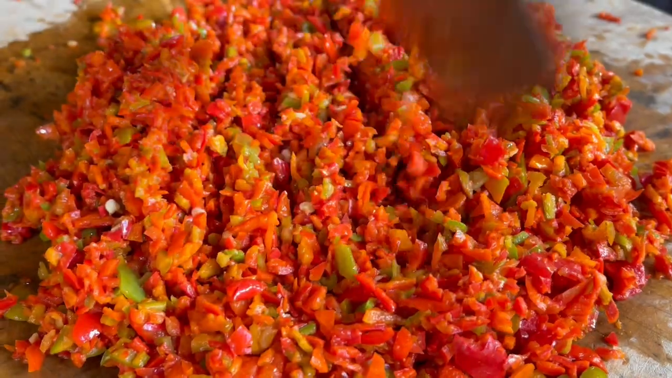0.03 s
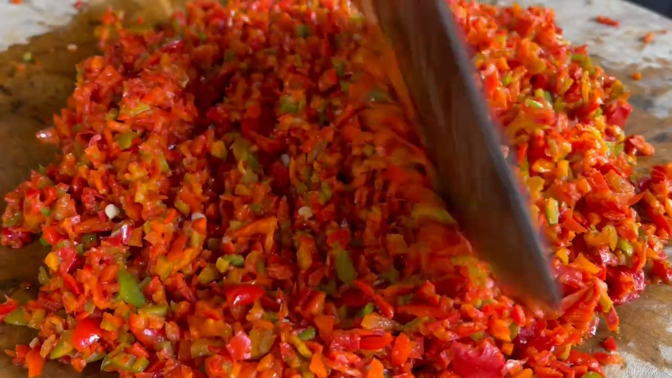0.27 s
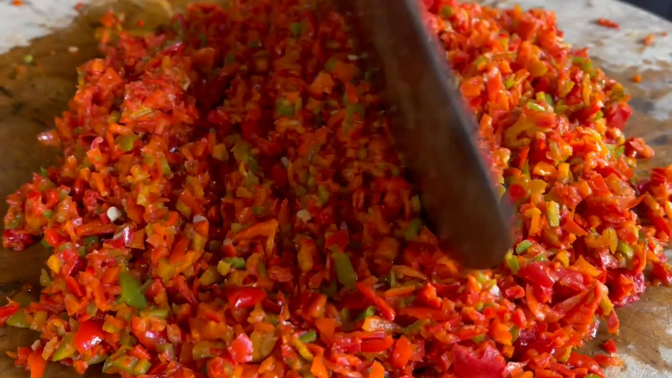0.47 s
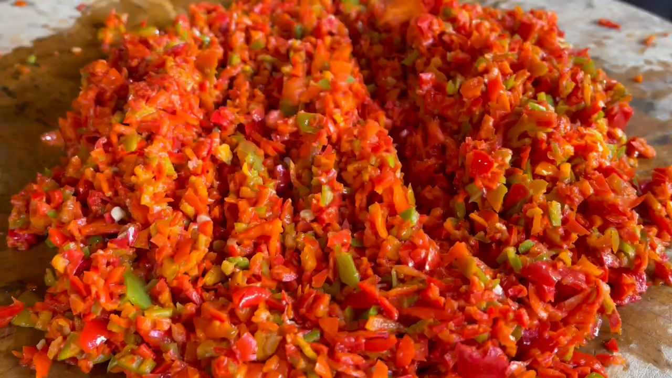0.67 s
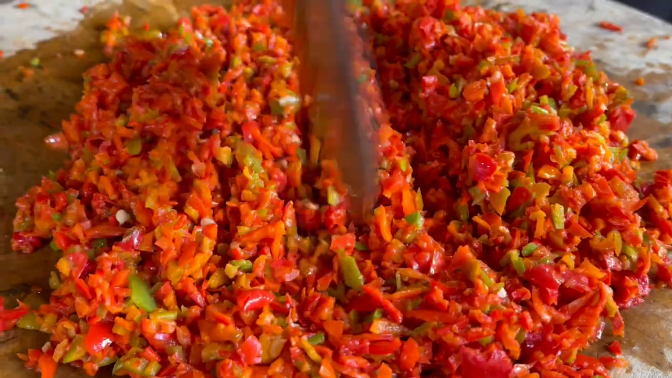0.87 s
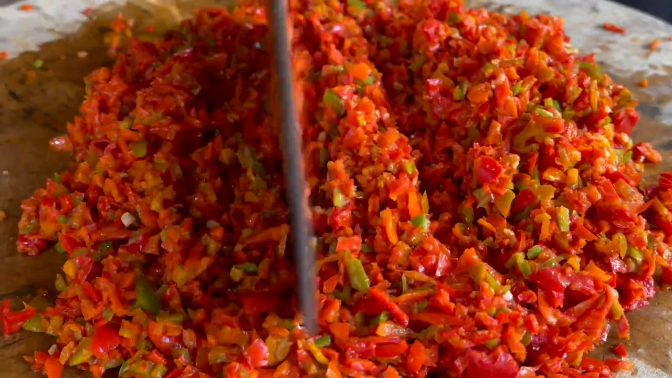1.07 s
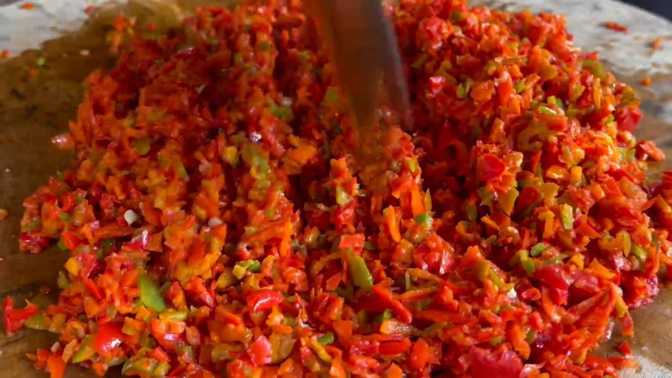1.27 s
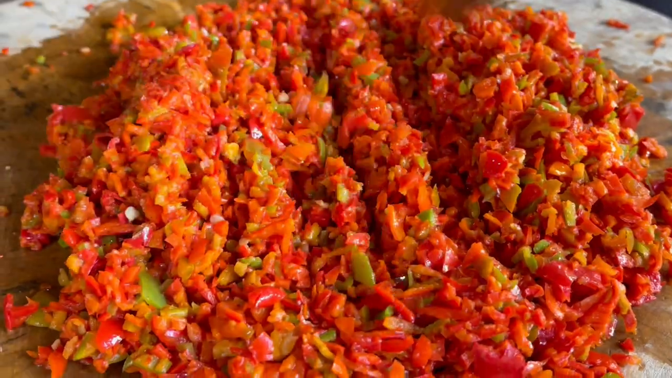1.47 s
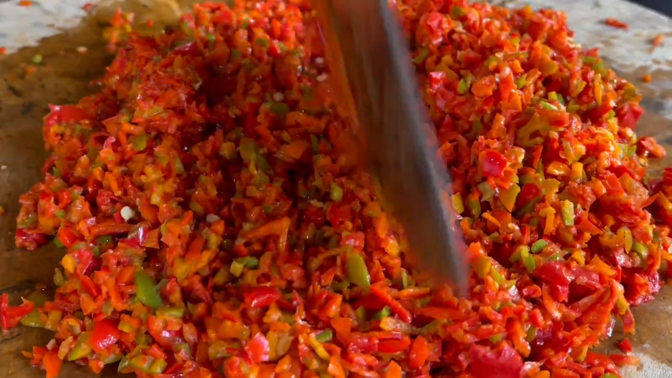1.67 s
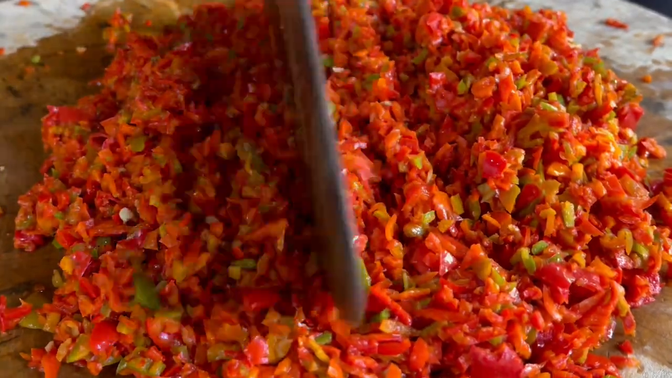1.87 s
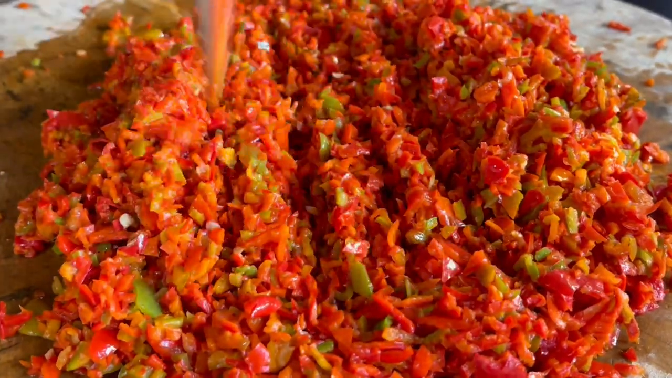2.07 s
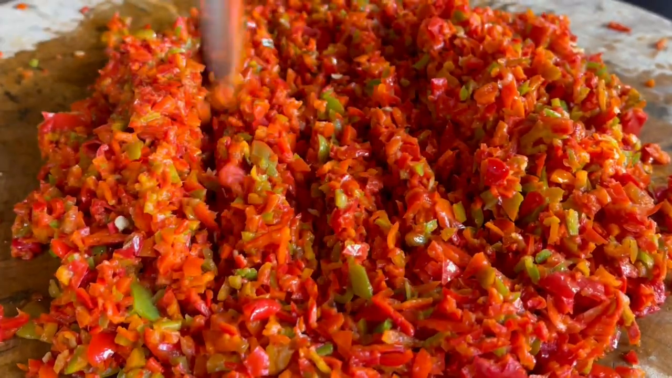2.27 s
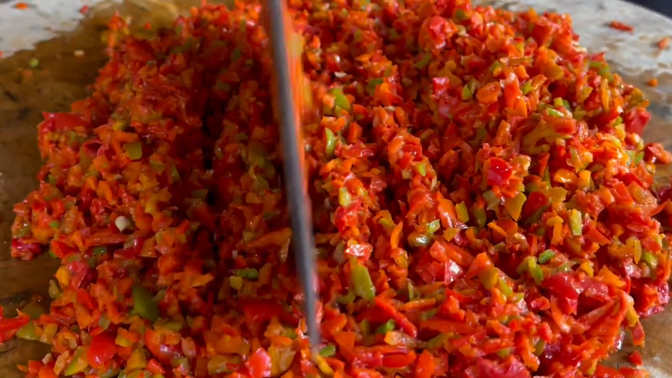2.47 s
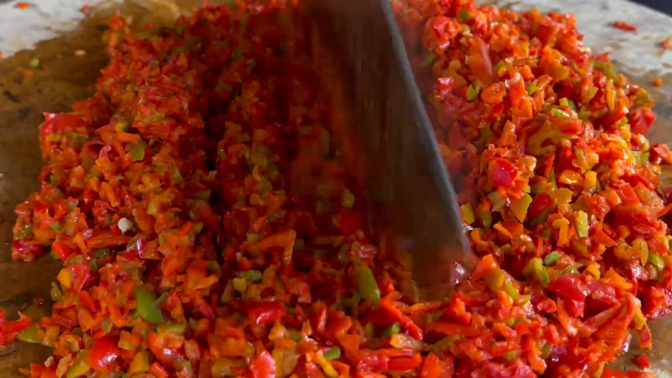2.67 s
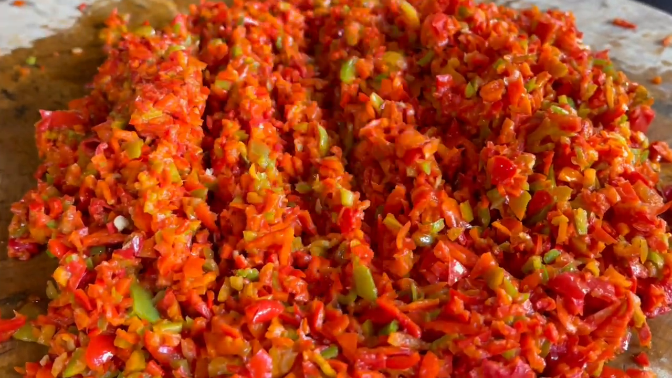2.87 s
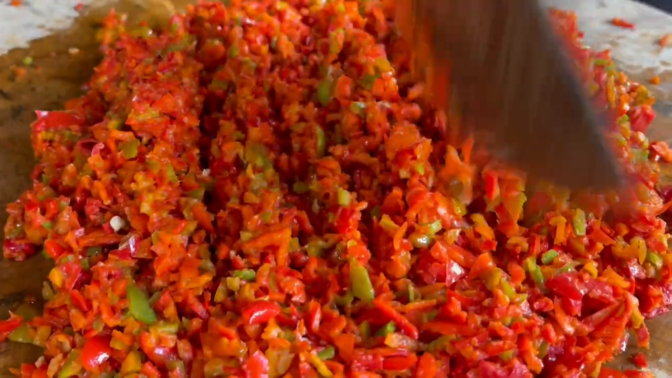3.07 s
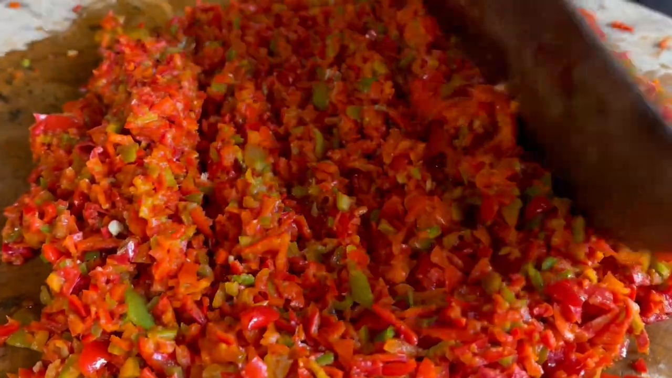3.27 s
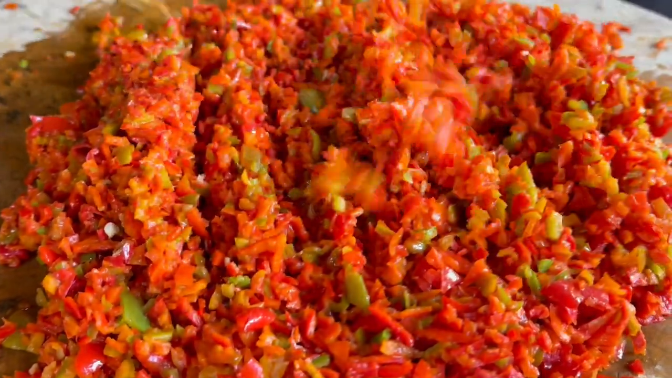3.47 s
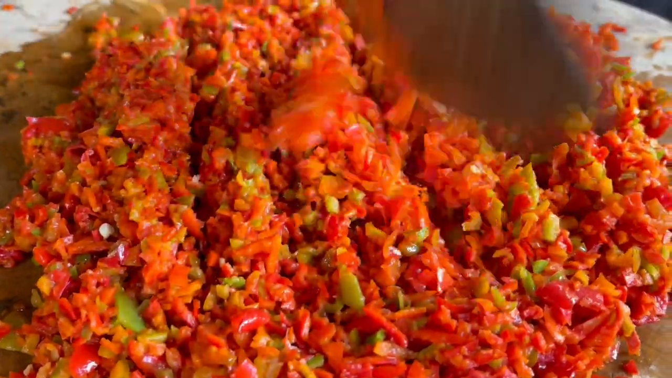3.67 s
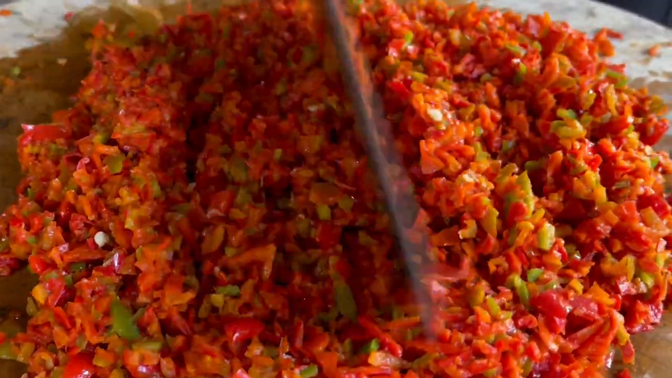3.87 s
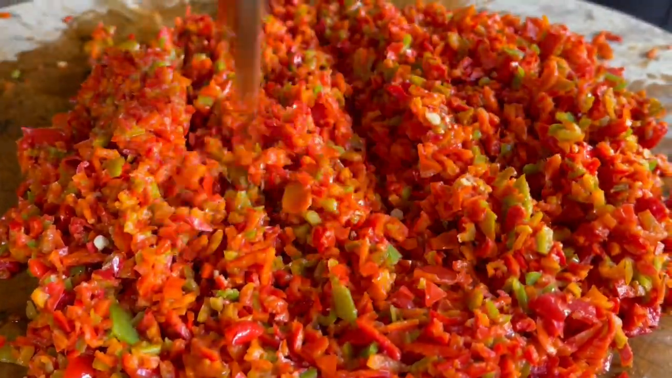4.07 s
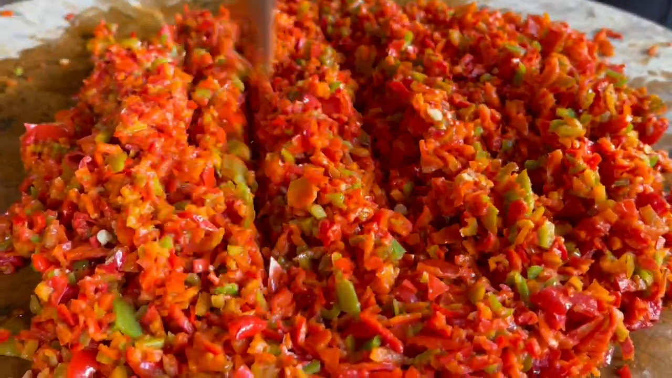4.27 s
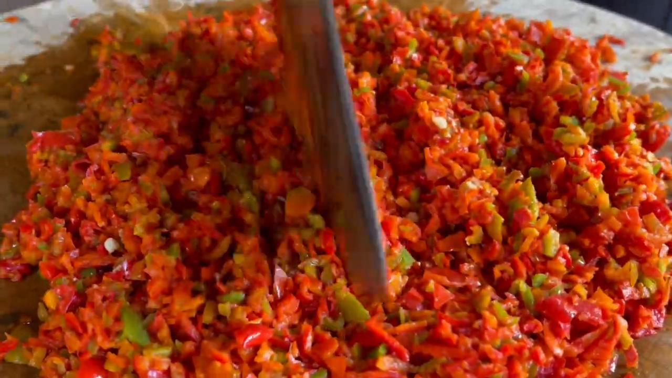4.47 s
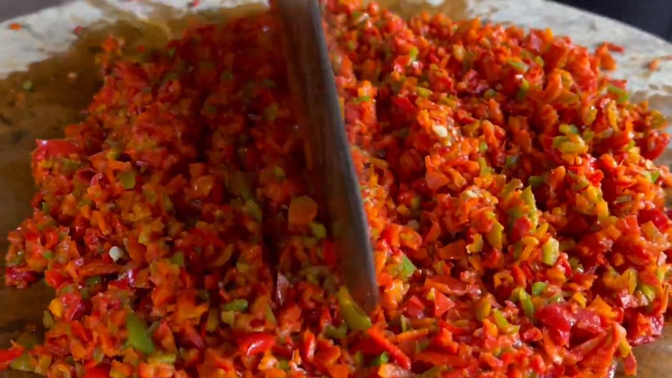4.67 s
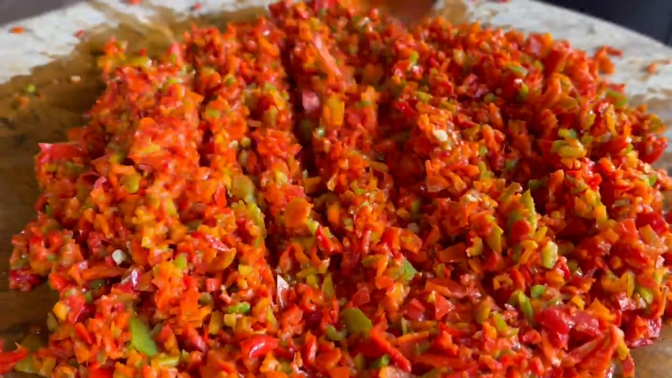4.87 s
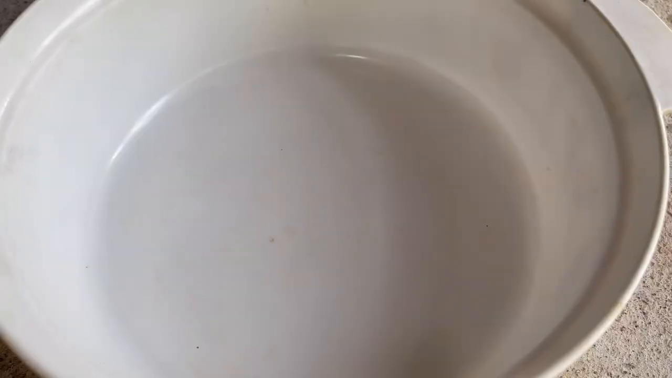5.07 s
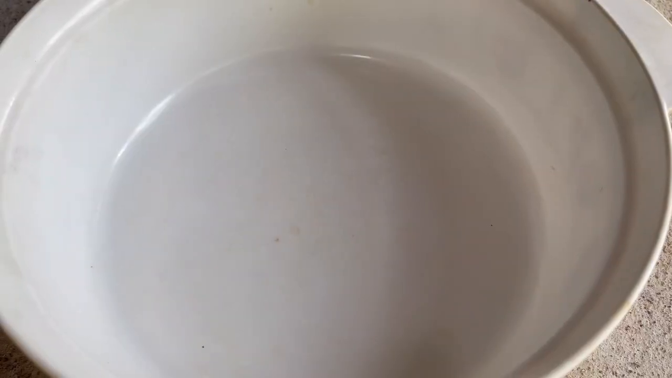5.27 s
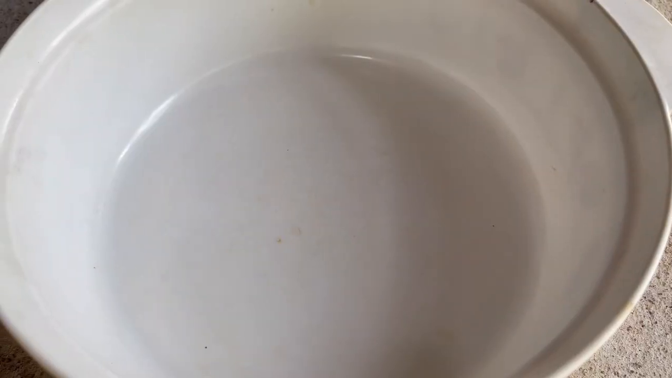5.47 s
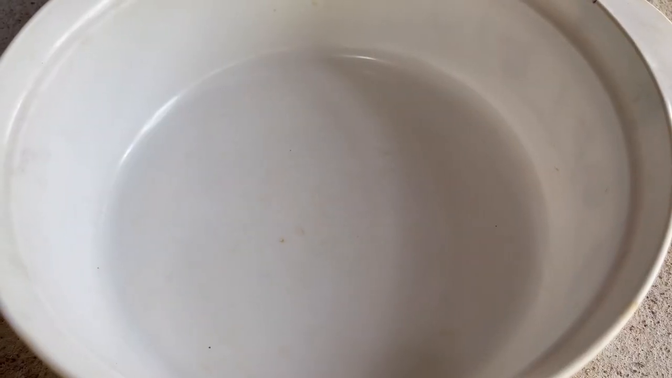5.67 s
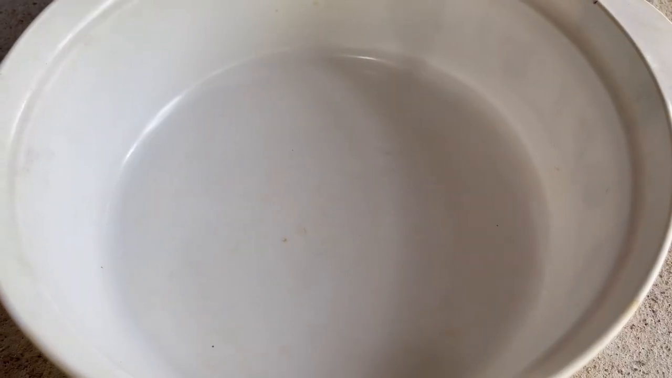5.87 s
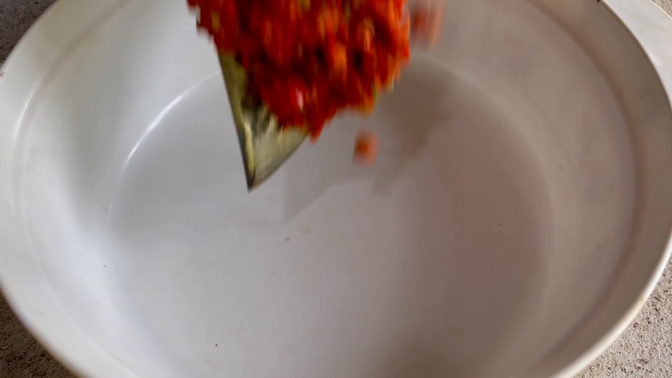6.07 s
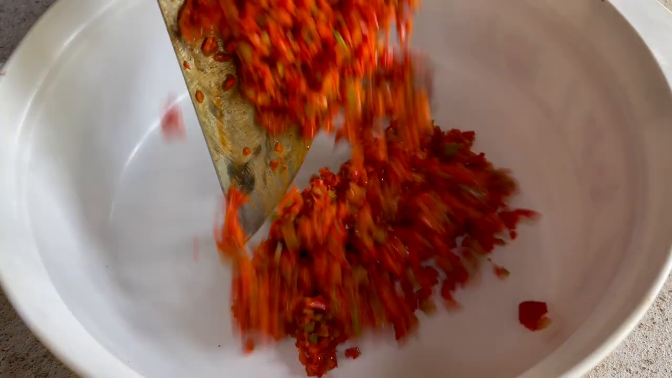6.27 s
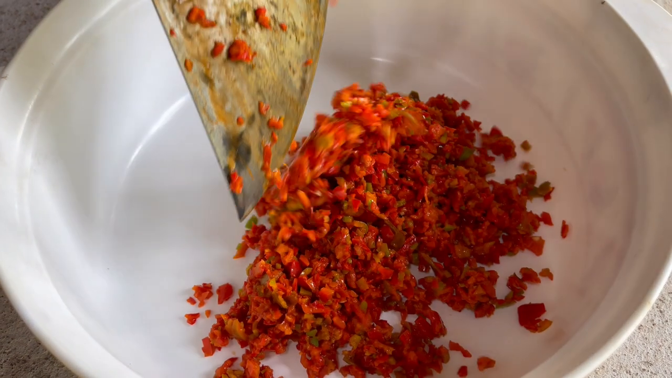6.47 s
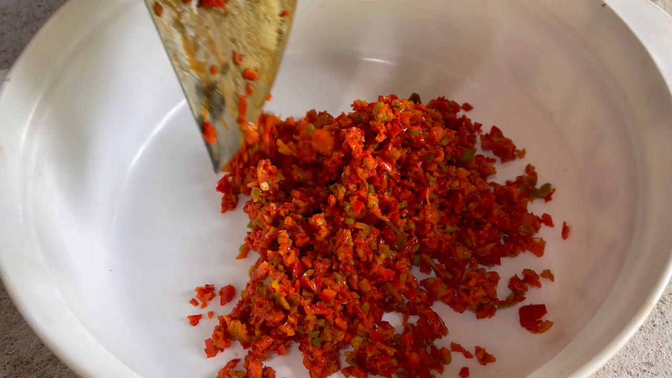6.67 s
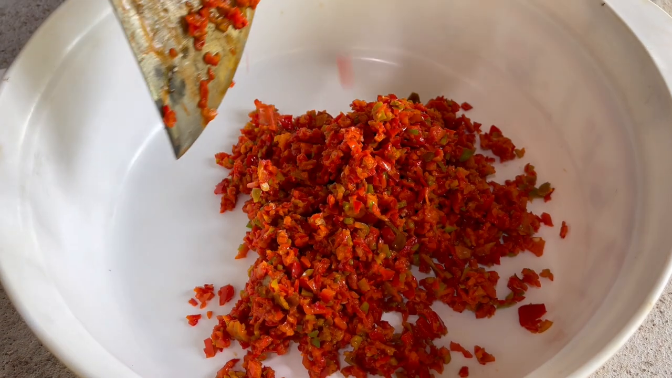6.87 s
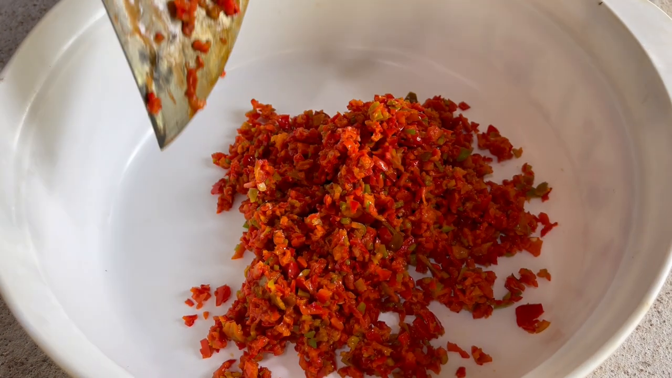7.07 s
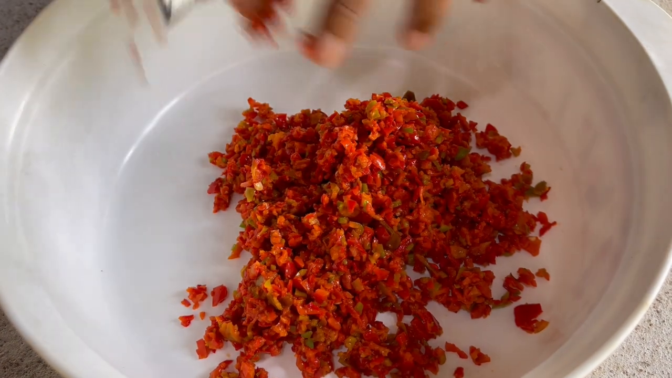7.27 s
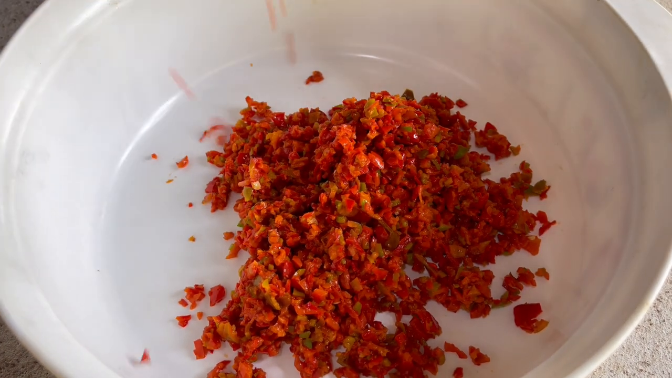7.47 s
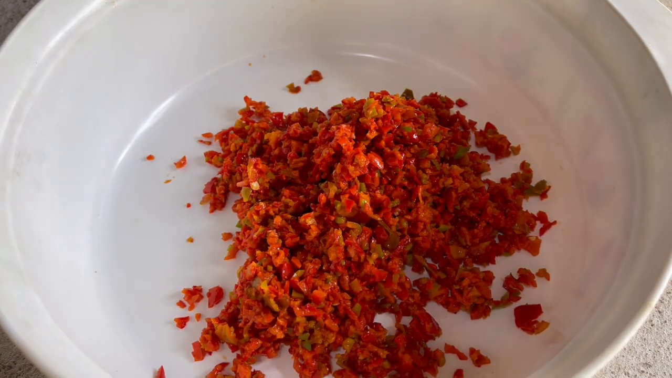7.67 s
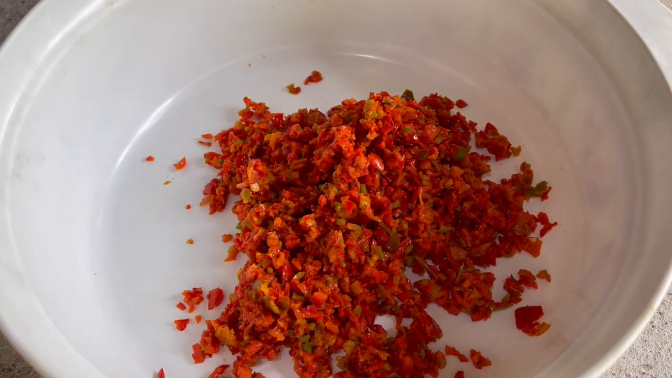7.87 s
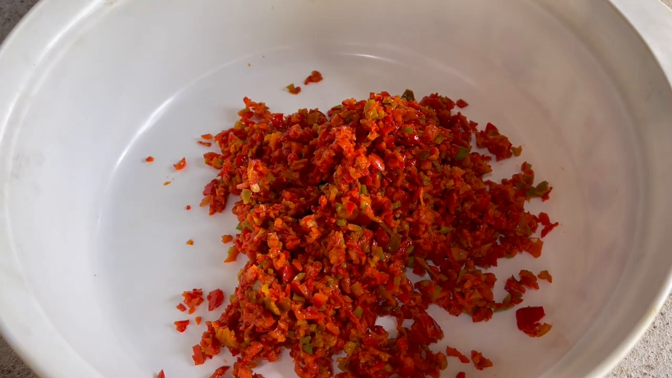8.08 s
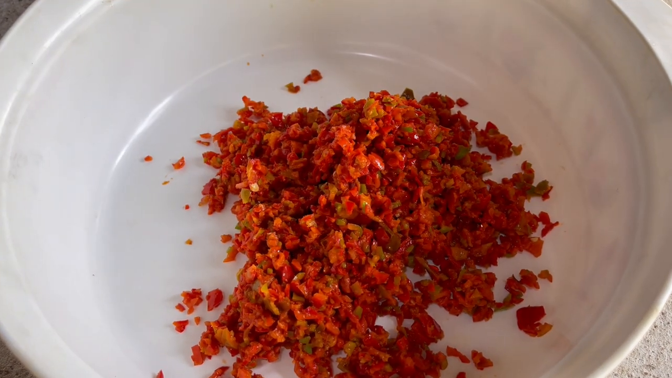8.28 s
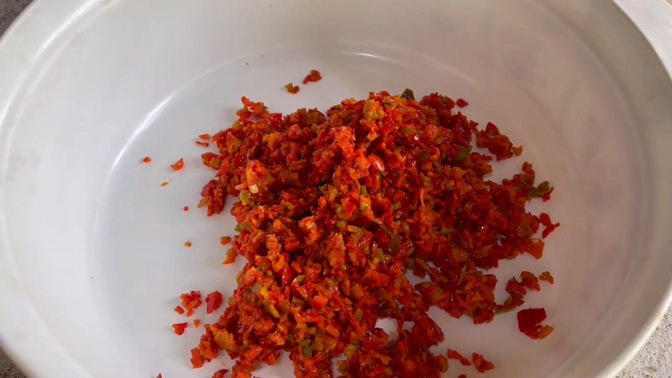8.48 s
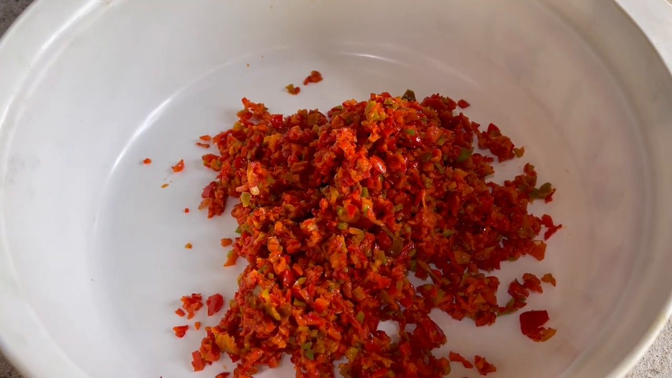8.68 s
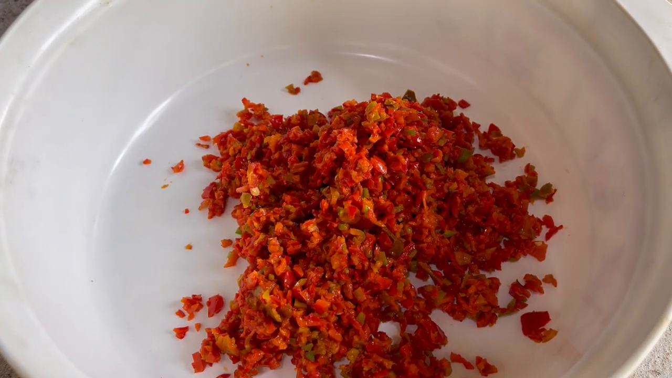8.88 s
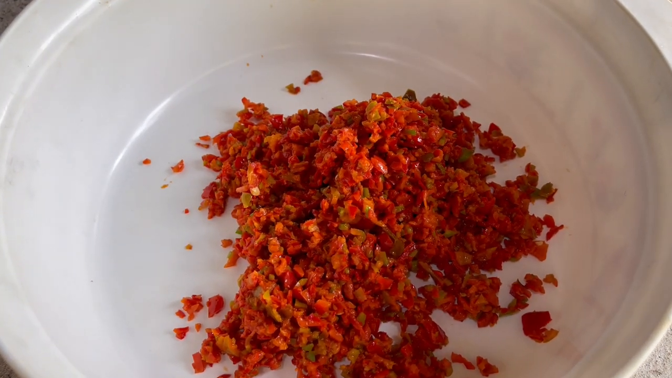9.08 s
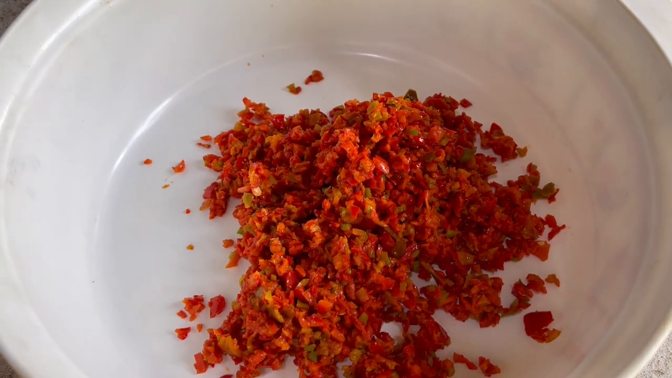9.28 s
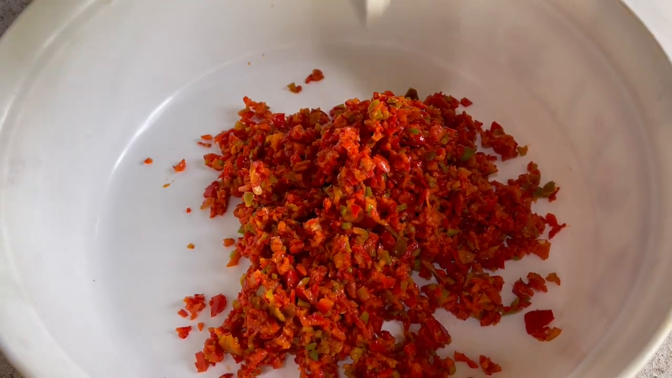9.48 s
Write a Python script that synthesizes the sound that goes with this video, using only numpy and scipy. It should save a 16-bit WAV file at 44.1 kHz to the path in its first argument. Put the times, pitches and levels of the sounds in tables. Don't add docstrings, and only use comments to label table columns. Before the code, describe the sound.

Loud, dry knife knocks with gritty crunch repeat evenly on a wooden block, captured closely in stereo in an open yard with falling chick whistles. The scene cuts abruptly to something much quieter: low rumble, a faint cock, then wet lumps splatting in a hard bowl, hissing wipes, crumbs ticking and stuttering scrapes of the blade on the block. Faint bird notes and insects remain at the end.

```python
import sys
import numpy as np
from scipy import signal
from scipy.fft import rfft, irfft, next_fast_len
from scipy.io import wavfile
from scipy.ndimage import uniform_filter1d, minimum_filter1d

SR = 44100
rng = np.random.default_rng(int(sys.argv[2]) if len(sys.argv) > 2 else 0)


def makeup_ratio(level_db):
    decades = np.asarray(level_db, float) / 20
    return 10 ** decades


def to_wav(sig):
    pcm = np.clip(np.atleast_2d(sig), -1, 1) * 32767
    pcm = np.round(pcm).astype(np.int16)
    wavfile.write(sys.argv[1], SR, pcm.T)


N = 420713
T = np.arange(N) / SR

CUT_S = 4.999, 5.043
# time in seconds, peak in dB, knock in dB rel. peak, crunch in dB rel. peak.
CHOPS = [(0.2378, -5, -9.5, -26.5), (0.513, -7.5, -7.5, -19), (0.793, -6.5, -6.5, -25),
         (1.066, -7.5, -5, -21.5), (1.3513, -7, -6.5, -22), (1.6339, -10.5, -1.5, -20),
         (1.9002, -7, -4.5, -23), (2.1714, -8.5, -2.5, -23), (2.4544, -6.5, -5, -23.5),
         (2.7313, -6.5, -7.5, -22), (3.01, -6.5, -7.5, -22), (3.3086, -7, -13.5, -16.5),
         (3.597, -6.5, -6.5, -20.5), (3.882, -8.5, -5, -18), (4.1629, -7, -3, -21.5),
         (4.441, -8, -6, -22.5), (4.7312, -8.5, -6, -27)]
CHOP_S, CHOP_DB, KNOCK_DB, CRUNCH_DB = np.transpose(CHOPS)
# hum while sinking, upper hum, top of the crunch, lower rattle and
# upper rattle, all in dB.
COLOUR = [(6, -18.5, 1.5, -49.5, -52.5), (8.5, -25.5, 0.5, -41.5, -53), (-8.5, -41, -1.5, -46, -53),
          (0, -38, 2, -48.5, -56), (-4.5, -35.5, -5, -44.5, -54), (3.5, -37.5, -2, -48.5, -58.5),
          (2, -32, 0.5, -50.5, -63), (-1, -36, -4.5, -60, -60.5), (1, -32.5, -2.5, -47.5, -57),
          (5.5, -35, 1, -46.5, -51.5), (1, -22, -2.5, -47, -46.5), (9, -21, -5.5, -51, -53.5),
          (-5, -39, -2.5, -45.5, -55.5), (-3.5, -16.5, -3.5, -52, -54.5), (-2, -39, 0, -46, -54),
          (0.5, -37, -3, -45.5, -52.5), (4, -32, 4, -47, -55.5)]
SINK_HUM_DB, UPPER_HUM_DB, CRUNCH_TOP_DB, LOW_RATTLE_DB, HIGH_RATTLE_DB = np.transpose(COLOUR)
# time in seconds, peak in dB, brightness in dB rel. peak.
TAPS = [(5.358, -57, -19.5), (5.682, -45, -12), (6.168, -36, -35), (6.181, -28.5, -16.5), (6.226, -34, 0.5),
        (6.243, -46, -11), (6.285, -29.5, 8), (6.319, -35, -3.5), (6.337, -52, -19), (6.341, -21, -5.5),
        (6.36, -41, -6), (6.403, -33.5, -4), (6.629, -27.5, -3), (6.666, -50, -2.5), (6.764, -30, -5),
        (7.419, -24.5, -14), (7.437, -21.5, -13), (7.525, -34, -23), (7.827, -47.5, -1),
        (7.912, -54.5, 1.5), (8.033, -46.5, 10), (8.196, -33.5, 6), (8.625, -53.5, -1), (8.726, -53.5, 4)]
# frequency in Hz, level in dB, t60 in seconds.
BOWL_MODES = [(220, -20.5, 0.02), (500, -2, 0.061), (780, -6, 0.028), (1047.5, -3, 0.02517),
              (1250, -2, 0.066), (1430, -1, 0.058), (1910, 0, 0.012), (2443, -10, 0.16), (2800, 0, 0.0073),
              (4247, -13, 0.03185), (5360, -16.5, 0.018)]
# frequency in Hz, left-right likeness from 0 to 1.
NEAR_ALIKE = [(60, .996), (150, .985), (300, .75), (700, .65), (2500, .88), (7000, .95), (10000, .99)]


def at_hz(points, hz):
    table = np.array(points)
    return np.interp(np.log(hz), np.log(table[:, 0]), table[:, 1])


def rms_one(x):
    return x / np.sqrt(np.mean(x ** 2) + 1e-20)


def clicks(times, sizes):
    out = np.zeros(np.shape(sizes)[:-1] + (N,)) + 1e-18
    out[..., np.round(np.asarray(times) * SR).astype(int)] = sizes
    return out


def dying(x, t60):
    return signal.lfilter([1], [1, -makeup_ratio(-60 / (t60 * SR))], x)


def swelling(x, t60):
    return dying(x[::-1], t60)[::-1]


def ring(x, hz, t60):
    r, w = makeup_ratio(-60 / (t60 * SR)), 2 * np.pi * hz / SR
    return signal.lfilter([0, np.sin(w)], [1, -2 * r * np.cos(w), r * r], x)


def humming(noise, hz, t60):
    return rms_one(ring(ring(noise, hz, t60), hz, t60))


def highpass(x, order, hz):
    return signal.sosfilt(signal.butter(order, hz, "high", fs=SR, output="sos"), x)


def drift(rate):
    knots = rng.standard_normal(int(N / SR * 100) + 2)
    return np.interp(T * rate, np.arange(len(knots)), knots)


def bands(gain_at, likeness, grain_db):
    edges_hz = 20 * 2 ** np.arange(0, 10, .5)
    grain = makeup_ratio(grain_db * rng.exponential(1, N).clip(0, 5))
    white = rms_one(rng.standard_normal((2, 2, N)) * grain)
    out = 0
    for k, (low, high) in enumerate(zip(edges_hz, edges_hz[1:])):
        band = signal.butter(2, [low, high], "band", fs=SR, output="sos")
        mid, side = signal.sosfilt(band, white[k % 2])
        hz = np.sqrt(low * high)
        alike = np.clip(at_hz(likeness, hz), -1, 1)
        stereo = np.sqrt(1 + alike) * mid + np.sqrt(1 - alike) * side * [[1], [-1]]
        out = out + gain_at(hz) * stereo
    return out


def struck(modes, times, hit_db, spread_db, side_db, contact_turns):
    # frequency in Hz, left over right in dB.
    block_left = [(160, 0), (420, 2), (680, 4), (1100, 2.5), (2900, 0)]
    out = 0
    chance = rng.standard_normal((len(times), len(modes), 2)).clip(-2, 2)
    for k, (hz, level_db, t60) in enumerate(modes):
        lean = side_db * (1 - at_hz(NEAR_ALIKE, hz)) * chance[:, k, 1] + at_hz(block_left, hz) / 2
        lean = lean * [[1], [-1]]
        sizes = (-1) ** k * makeup_ratio(hit_db(hz) + level_db + spread_db * chance[:, k, 0] + lean)
        soft = np.exp(-hz / contact_turns / SR)
        push = signal.lfilter([(1 - soft) ** 2], [1, -2 * soft, soft ** 2], clicks(times, sizes))
        out = out + ring(push, hz, t60) * (1 + (2 * np.pi * contact_turns) ** 2)
    return out


def block_knocks():
    # frequency in Hz, level in dB, t60 in seconds.
    block_modes = [(57, -20, 0.11), (104, -2, 0.026), (154.14, 0.5, 0.1), (260, -9, 0.037),
                   (336, -16.5, 0.052), (465, -9, 0.067), (590, 5.5, 0.036), (650, 7, 0.01),
                   (884, -4, 0.041), (952.7, -3.5, 0.059), (1176, 8, 0.008), (1425, 2.5, 0.011),
                   (1840, -16, 0.03), (1806, -10, 0.019), (2164, -6, 0.02)]
    # frequency in Hz, level in dB, t60 in seconds.
    dent_modes = [(724, 8, 0.033), (1900, -11, 0.015)]
    # frequency in Hz, level in dB, t60 in seconds.
    clack_modes = [(1810, -25.5, 0.013), (2097, -25.5, 0.052), (2420, -21, 0.043)]
    # thump, hollow, lower over upper main mode, lower over upper knock mode
    # and late clack, all in dB.
    seating = [(-2, -3, -1, -4, 0.5), (1, -4, -0.5, -7, -7.5), (0, 2, 4.5, 2.5, -5), (2, 3, 1.5, 3.5, -4),
               (0, -3, 1.5, -2, 0), (0.5, -7, 2, -4.5, -2.5), (2, 3.5, 2, 2, -7.5), (5, 4.5, 4, 3.5, -17.5),
               (2, 5.5, 2.5, 3.5, -4.5), (-1.5, -3.5, 1, 2.5, -1), (1.5, 1.5, 5, 1.5, 2),
               (-1.5, 0.5, 2.5, -5, -2.5), (3.5, -2.5, -2, -2, -6), (-1.5, -2, 3.5, -1, -8.5),
               (1.5, 4, -1.5, 2.5, -2.5), (2, 1, 4.5, 4, -2.5), (1.5, 1.5, 5, -3.5, -8)]
    snaps = [0, 0, 1, -1, -1, 0, -0.5, -2, -2, 0, -0.5, -5, 0, 0, 1, 1, 2]
    rock_s, rock_low_db, rock_high_db = 0.00809, -3.5, -15
    thump, hollow, main, upper, clack = np.transpose(seating)
    seats = [(190, thump), (300, 1.8 * hollow), (520, hollow), (660, main), (800, -main),
             (900, upper), (1050, -upper), (np.inf, 0)]

    def blow_db(hz):
        seat = next(db for below_hz, db in seats if hz < below_hz)
        thump_and_snap = -1 * (hz < 280) + 2 * (hz > 1300) + np.multiply(snaps, hz > 1750)
        return CHOP_DB - 4.5 + seat + (KNOCK_DB + 6) * (800 < hz < 1750) + thump_and_snap

    def rock_db(hz):
        return blow_db(hz) + (rock_low_db if hz < 400 else rock_high_db)

    out = struck(block_modes, CHOP_S, blow_db, spread_db=.6, side_db=11, contact_turns=.15)
    out -= struck(dent_modes, CHOP_S - .0001, blow_db, spread_db=.6, side_db=11, contact_turns=.25)
    out = highpass(out, 2, 75)
    out += struck(block_modes, CHOP_S + rock_s, rock_db, spread_db=1.2, side_db=11, contact_turns=0.17)
    out += struck(clack_modes, CHOP_S + .017, lambda hz: clack - 7, spread_db=3.0, side_db=11,
                  contact_turns=.6)
    return out


def crunch_and_scatter():
    # frequency in Hz, level in dB per Hz.
    crunch_tone = [(300, -11), (900, 18.5), (1600, 7), (3500, -0.5), (5000, 2.5), (6500, -8.5),
                   (9000, -0.5), (12000, 0)]
    # frequency in Hz, level in dB per Hz.
    echo_tone = [(35, -30.5), (60, -11), (161, 2), (379, -6), (727, 5.5), (930, -24.5), (1220, -16.5),
                 (2670, -29), (2860, -38), (4500, -37), (6200, -44.5), (8800, -43), (12900, -50),
                 (16800, -84), (22000, -120)]
    # frequency in Hz, t60 in seconds.
    echo_t60 = [(60, .2), (200, .12), (800, .115), (3000, .19), (9000, .2)]
    hits = clicks(CHOP_S - 0.0003, makeup_ratio(CHOP_DB + CRUNCH_DB + 12))
    hits[int(.786 * SR)] = makeup_ratio(-30)
    hits[int(.503 * SR)] = makeup_ratio(-29.5)
    slicing = makeup_ratio(-10.5) * swelling(hits, 0.026)
    cutting = np.maximum(swelling(hits, 0.006), slicing)
    knocks = clicks(CHOP_S + 0.0013, makeup_ratio(CHOP_DB + 2.5))
    knocks[0] = makeup_ratio(-32.5)
    knocks[int(4.872 * SR)] = makeup_ratio(-37.0)
    knocks = uniform_filter1d(knocks, size=250, origin=124)

    def gain_at(hz):
        patches_db = 4.2 * min(hz / 2000, 1) * drift(70)
        tail = makeup_ratio(at_hz(echo_tone, hz) + 2.0 + patches_db) * dying(knocks, at_hz(echo_t60, hz))
        crack = np.maximum(cutting, dying(hits, .012 * (6000 / hz) ** .7)) * (hz > 1800)
        crack = crack * makeup_ratio(np.interp(T, CHOP_S, CRUNCH_TOP_DB) * np.clip(np.log2(hz / 5000), 0, 1.3))
        return np.hypot(makeup_ratio(at_hz(crunch_tone, hz)) * crack, tail)
    return bands(gain_at, NEAR_ALIKE, grain_db=4.5)


def sinking_hum():
    t60, rise_s, hum_db = .03, 0.05, -32
    low = humming(rng.standard_normal(N), 950, t60)
    low = low * swelling(clicks(CHOP_S, makeup_ratio(CHOP_DB + SINK_HUM_DB + hum_db)), rise_s)
    high = humming(rng.standard_normal(N), 1740, t60 / 2)
    high = high * swelling(clicks(CHOP_S - .004, makeup_ratio(UPPER_HUM_DB + hum_db + 2.0)), rise_s)
    return low + high


def blade_ring():
    # frequency in Hz, level in dB, t60 in seconds.
    blade_modes = [(2663, -43, .33), (3876, -47, .36), (5879, -49, .24)]
    # first, second and third bending mode in dB.
    stirs = [(3.5, 6, -14), (4, 1, -8.5), (-5, 0.5, -11), (-4, -3.5, -4), (4.5, -19.5, -7), (-6.5, -4, -10),
             (-10, -4.5, -11), (-14.5, -9.5, -10.5), (-2.5, -1, -17), (1.5, 2.5, -7.5), (5, 0, 0.5),
             (10.5, 3, -4), (-8, -4.5, -9.5), (-6, -2, -6.5), (0, 1, -11.5), (-3, -8, -5), (2.5, -17.5, -7)]
    trim_db = [-9.5, -7, 1.5]
    # time in seconds, frequency in Hz, level in dB, t60 in seconds.
    sings = [
        (2.736, 8300, -50.5, .2),
        (3.015, 8300, -46.5, 0.18),
        (3.015, 9100, -46, 0.14),
        (3.313, 7700, -55.5, 0.27),
        (3.313, 9100, -57.5, 0.24),
    ]

    def ring_db(hz):
        k = [mode[0] for mode in blade_modes].index(hz)
        return np.transpose(stirs)[k] + trim_db[k]

    steel = struck(blade_modes, CHOP_S + 0.0039, ring_db, spread_db=0, side_db=11, contact_turns=0.64)
    steel += struck(blade_modes[:2], [0], lambda hz: np.array([-13.0]), spread_db=0, side_db=0,
                    contact_turns=.3)
    for at, hz, level_db, t60 in sings:
        steel += ring(clicks([at], [makeup_ratio(level_db)]), hz, t60)
    return steel


def blade_chatter():
    # frequency in Hz, t60 in seconds.
    rattle_modes = [(4600, .004), (7000, .003)]
    late_s = .0095
    out = np.zeros((2, N))
    for (hz, t60), rattle_db in zip(rattle_modes, [LOW_RATTLE_DB, HIGH_RATTLE_DB]):
        grit = rng.standard_normal((2, N)) * makeup_ratio(3.0 * drift(99))
        chatter = humming(grit[0] + .3 * grit[1] * [[1], [-1]], hz, t60)
        out += chatter * dying(clicks(CHOP_S + late_s, makeup_ratio(rattle_db + 6.0)), .09)
        out += ring(clicks(CHOP_S + late_s, makeup_ratio(rattle_db + 8.0)), hz, 2 * t60)
    return out


def chops():
    return block_knocks() + crunch_and_scatter() + sinking_hum() + blade_ring() + blade_chatter()


def strokes():
    # peak time, rise and fall in seconds, hiss in dB,
    # weight from 0 (a wipe) to 1 (the load lands) and beyond.
    sweeps = [(5.65, 0.037, 0.83, -74.5, 1.28), (6.09, 0.18, 0.96, -58, 0.81),
              (6.171, 0.0053, 0.12, -55.5, 1.36), (6.228, .006, 0.035, -64, 0.94),
              (6.256, 0.052, 0.099, -46.5, 1.02), (6.345, 0.017, 0.055, -47.5, 0.95),
              (6.45, 0.27, 0.12, -61.5, 0.86), (6.63, 0.0065, 0.03, -54.5, 0.96),
              (6.762, 0.31, 0.084, -47, 0.39), (7.211, 0.12, 0.14, -43, .05),
              (7.34, 0.07, 0.1, -61.5, 0.86), (7.42, 0.059, 0.14, -64.5, 1.17),
              (7.529, 0.031, 0.09, -65.5, 1.13), (7.92, 0.13, 0.7, -68, 0.97),
              (8.036, 0.012, 0.32, -47.5, 0.58), (8.33, 0.12, .15, -62.5, 0.36),
              (8.441, 0.042, .06, -51.5, .5), (6.67, .03, .04, -59.5, 0.17), (6.31, .005, .02, -49, .5),
              (8.06, 0.11, 0.3, -75, 1.1), (8.22, 0.34, 0.17, -56.5, 0.65), (8.52, 0.2, 0.084, -42, 0.55),
              (8.749, 0.24, 0.62, -100, 2.07), (9.501, 0.092, 0.24, -72.5, 0.76)]
    # Rub, bowl and rumble against the hiss of a weightless wipe, in dB.
    wipe_db = [-26.5, -32.5, -36.5]
    weight_db = [29.5, 34.5, 44]
    power = np.full((4, N // 64 + 1), 1e-12)
    t = np.arange(power.shape[1]) * 64 / SR
    for s, rise, fall, hiss_db, weight in sweeps:
        shape = hiss_db - 20 * np.maximum((s - t) / max(rise, .003), (t - s) / max(fall, .003))
        added = np.multiply(weight_db, [min(weight, 1), weight, min(weight, 1)])
        layers = np.append(0, np.add(wipe_db, added))
        layers[-1] += 12 * (8.7 < s)
        power += makeup_ratio(2 * (shape + layers[:, None]))
    return [np.interp(T, t, row) for row in 10 * np.log10(power)]


def bowl_slide():
    # time in seconds, peak in dB.
    crumbs = [(6.062, -44), (6.1794, -29), (6.248, -34.5), (6.3101, -25), (6.337, -38.5), (6.6276, -40),
              (6.6632, -38.5), (6.7455, -34.5), (7.0277, -57), (7.08, -50.5), (7.1646, -44), (7.3226, -48),
              (7.3963, -35.5), (7.4144, -34), (7.441, -35), (7.5247, -39), (7.6068, -43), (7.8261, -53),
              (6.285, -35.5), (6.361, -35), (6.413, -42), (6.848, -46.5), (7.9142, -45.5), (7.95, -41),
              (8.029, -29), (8.1975, -46.5), (8.272, -47.5), (8.441, -35), (8.6216, -49), (8.728, -52),
              (8.8523, -51), (9.4877, -45)]
    hiss, rub, body, rumble = strokes()
    together = drift(70)
    at, tap_db, bright = np.transpose(TAPS)
    splats = dying(clicks(at, makeup_ratio(tap_db)), 0.033)
    crumb_s, crumb_db = np.transpose(crumbs)
    ticks = dying(clicks(at, makeup_ratio(tap_db + bright)) + clicks(crumb_s, makeup_ratio(crumb_db)), 0.022)
    places = np.log([90, 195, 330, 800, 3500, 6300, 9000, 13000])
    levels = [rumble - 10, rumble + 19, body + 3, body + 11,
              rub + 7, (rub + hiss) / 2 + 0.63, hiss + 6, hiss - 4.5]

    def gain_at(hz):
        place = np.interp(np.log(hz), places, np.arange(8))
        low = min(int(place), 6)
        slide = levels[low] + (levels[low + 1] - levels[low]) * (place - low)
        slide = slide + (5.0 if hz < 330 else 2.8) * drift(35)
        slide = slide + 1.9 * (hz > 2500) * together
        sharp = ticks * makeup_ratio(-8.0) if hz > 5200 else splats * makeup_ratio(-8.5) * (hz > 400)
        return np.hypot(makeup_ratio(slide), sharp)

    rubbing = rng.standard_normal((2, N))
    low_rub, high_rub = rubbing * makeup_ratio(body - 24.0), rubbing * makeup_ratio(rub - 15.5)
    hum = 0
    for hz, level_db, t60 in BOWL_MODES:
        hum = hum + makeup_ratio(level_db) * ring(low_rub if hz < 1600 else high_rub, hz, 0.23 * t60)
    lags = np.arange(int(.03 * SR))
    wall = rng.standard_normal(len(lags)) * makeup_ratio(-60 * lags / len(lags))
    wall = np.diff(wall, prepend=0) / np.linalg.norm(wall) / 2
    wall[0] = .8
    slide = bands(gain_at, NEAR_ALIKE, grain_db=4.0)
    return hum + signal.fftconvolve(slide, wall[None], axes=1)[:, :N]


def bowl_hits():
    # time in seconds, peak in dB.
    lumps = [(6.168, -30), (6.182, -35.5), (6.224, -31), (6.235, -28), (6.242, -27), (6.258, -31.5),
             (6.27, -30.5), (6.284, -53), (6.317, -39), (6.343, -28), (6.351, -41), (6.366, -58),
             (6.385, -45), (6.405, -44), (6.426, -43.5), (6.463, -50), (6.479, -51), (6.494, -49)]
    # frequency in Hz, level in dB, t60 in seconds.
    lump_modes = [(576, -4.5, 0.036), (802, -10, .1), (1157, 2.5, 0.045), (1620, -2.5, 0.044),
                  (2370, -15, 0.043), (3500, -26, .025)]
    lump_s, lump_db = np.transpose(lumps)
    tap_s, tap_db, _ = np.transpose(TAPS)
    thuds = struck(lump_modes, lump_s, lambda hz: lump_db - 7.5, spread_db=2.2, side_db=16.0,
                   contact_turns=0.19)
    return thuds + struck(BOWL_MODES, tap_s, lambda hz: tap_db - 27, spread_db=9.0, side_db=16.0,
                          contact_turns=0.22)


def drags():
    # peak time, rise and fall in seconds, level in dB.
    pulls = [
        (8.048, 0.041, 0.082, -50.5),
        (8.115, 0.058, 0.37, -52.5),
        (8.3, .15, 0.11, -65),
        (8.51, 0.21, 0.11, -50.5),
    ]
    # frequency in Hz, level in dB, t60 in seconds.
    bite_modes = [(179, 8.5, 0.027), (666, 2, 0.013), (852, -2.5, 0.097), (1010, -7, 0.057),
                  (1427, -4.5, 0.072), (1960, -10, .06), (4130, -9, 0.041)]
    # frequency in Hz, level in dB, t60 in seconds.
    sweep_modes = [(233, 3, 0.051), (517, -3, 0.054), (770, -5, 0.022), (2070, -6, 0.022),
                   (2310, -1, 0.025), (3040, -8, 0.032), (4900, -7, 0.049), (5680, -4.5, 0.013)]
    unevenness = makeup_ratio(2.0 * rng.exponential(1, N).clip(0, 5) + 2.8 * drift(60))
    grit = rms_one(rng.standard_normal((2, N)) * unevenness)
    grit = grit[0] + 0.43 * grit[1] * [[1], [-1]]
    out = np.zeros((2, N))
    for s, rise, fall, level_db in pulls:
        span = slice(int((s - 3 * rise) * SR), int((s + 3 * fall) * SR))
        shape = np.maximum((s - T[span]) / rise, (T[span] - s) / fall)
        push = makeup_ratio(level_db - 20 * shape) * grit[:, span]
        for hz, mode_db, t60 in (bite_modes if rise < .1 else sweep_modes):
            out[:, span] += makeup_ratio(mode_db) * ring(push, hz, t60) / np.sqrt(t60 * SR / 28)
    return out


def far_echo(x, t60, wet_db):
    lags = np.arange(int(t60 * SR))
    tail = rng.standard_normal((2, len(lags))) * makeup_ratio(-60 * lags / len(lags))
    tail = rms_one(tail) / np.sqrt(len(lags))
    return x + makeup_ratio(wet_db) * signal.fftconvolve(x[None], tail, axes=1)[:, :N]


def chicks():
    # time in seconds, level in dB.
    cheeps = [(0.001, -61), (0.264, -56), (0.532, -60), (0.749, -70), (1.303, -57), (1.564, -55),
              (1.816, -55.5), (2.084, -55.5), (2.348, -56), (2.598, -55.5), (2.862, -54.5), (3.126, -55),
              (3.382, -56.5), (3.657, -54.5), (3.92, -57.5), (4.189, -54.5), (4.699, -57.5), (4.974, -55),
              (5.05, -64.5), (5.5, -68.5), (1.03, -64)]
    start_hz, end_hz, fall_s = 4300, 2330, .07
    flick_hz, flick_s = 1300, .004
    out, age = np.zeros((2, N + SR)), np.arange(int(.1 * SR)) / SR
    hoarse = 1 + .025 * drift(99)
    shape = np.sin(np.pi * (age / age[-1]) ** .3)
    for s, level_db in cheeps:
        second = s > CUT_S[0]
        fall = np.clip(1 - age / fall_s / (1.25 if second else 1), 0, 1) ** 1.8
        hz = end_hz + (start_hz - end_hz) * fall + flick_hz * np.exp(-age / flick_s)
        hz = hz * hoarse[int(s * SR):][:len(age)]
        whistle = shape * np.sin(2 * np.pi * np.cumsum(hz) / SR)
        out[int(second), int((s + .003) * SR):][:len(age)] += makeup_ratio(level_db - 7.0) * whistle
    early, late = (far_echo(calls[:N], .28, wet_db=10) for calls in out)
    return np.where(T < CUT_S[1], early, late)


def far_birds():
    # start and length in seconds, pitch in Hz, level in dB.
    warbles = [(5.768, 0.11, 1690, -72.5), (6.557, 0.07, 1990, -70.5), (6.714, 0.14, 1785, -72),
               (6.803, 0.14, 1554, -72), (6.867, 0.021, 866, -65), (6.954, 0.094, 1970, -68.5),
               (7.088, 0.095, 1364, -75), (7.121, 0.08, 1730, -67), (7.214, 0.14, 1547, -71.5),
               (7.31, 0.12, 1054, -78), (7.387, 0.081, 1590, -66), (7.511, 0.071, 1847, -64.5),
               (7.596, 0.17, 1480, -73), (7.717, 0.075, 1996, -66), (7.774, 0.21, 1415, -75.5),
               (7.844, 0.31, 1714, -74.5), (7.985, 0.037, 1530, -68), (8.303, 0.076, 1610, -70),
               (8.587, 0.11, 1643, -69), (8.724, 0.049, 1617, -66.5), (8.826, 0.23, 1425, -79.5),
               (8.954, 0.066, 1950, -73), (8.985, 0.16, 1374, -80.5)]
    # time in seconds, pitch in Hz, level in dB.
    crow = [
        (5.579, 500, -93.5),
        (5.605, 497, -64.5),
        (5.73, 501, -70.5),
        (5.801, 586, -63),
        (5.876, 590, -72.5),
        (5.958, 659.4, -59.5),
        (6.101, 590, -95),
        (6.159, 540, -99),
    ]
    out, waver = np.zeros(N), 1 + .06 * drift(97)
    for s, length, hz, level_db in warbles:
        span = slice(int(s * SR), int((s + length) * SR))
        age = T[span] - s
        shape = np.minimum(age / 0.0011, 1) * (1 - age / length)
        droop = 1 + .1 * (.5 - age / length) * (length < .11) * (s > 7.5)
        turns = hz * np.cumsum(waver[span] * droop) / SR
        out[span] += makeup_ratio(level_db + 5.0) * shape * np.sin(2 * np.pi * turns)
    s, pitch, level = np.transpose(crow)
    turns = np.cumsum(np.interp(T, s, pitch) * (1 + .04 * drift(95))) / SR
    voice = 0
    for k, db in enumerate([-4, -5, -15], start=1):
        voice = voice + makeup_ratio(db) * np.sin(2 * np.pi * k * turns)
    return far_echo(out + voice * makeup_ratio(np.interp(T, s, level, -150, -150)), .4, wet_db=13)


def yard():
    # frequency in Hz, level in dB per Hz.
    chopping_tone = [(12, -32), (20, 0), (86, 4), (222, -28), (414, -17), (543, -19), (657, -19.5),
                     (794, -16.5), (1440, -31), (3810, -30), (6550, -64.5), (9070, -36), (11300, -52),
                     (12900, -76.5), (16800, -106), (22000, -120)]
    # frequency in Hz, level in dB per Hz.
    bowl_tone = [(12, -69), (20, -45), (49, -1.5), (96, 1.5), (170, -17.5), (222, -28.5), (1070, -30.5),
                 (1260, -42), (2680, -38), (3810, -52), (4740, -47), (7110, -103), (9070, -37),
                 (12900, -63), (16800, -96), (22000, -120)]
    # frequency in Hz, left-right likeness from 0 to 1.
    far_alike = [(60, .996), (170, .93), (510, .5), (1400, .1), (4300, .4), (8000, .8), (10500, .97)]
    # time in seconds, level in dB.
    hush = [
        (5.0, -4),
        (5.55, -3.5),
        (5.7, -0.5),
    ]
    # time in seconds, level in dB.
    insect_swell = [
        (9.1, -1),
        (9.3, 8),
    ]
    passing = np.interp(T, [5.0, 5.05, 5.75, 5.95], [-0.5, -1.0, 5.0, -4.0])
    first, lumps = T < CUT_S[0], 1.2 * drift(1.2)
    hush_db = np.interp(T, *np.transpose(hush), left=0)

    def gain_at(hz):
        still = np.where(first, at_hz(chopping_tone, hz) - 49, at_hz(bowl_tone, hz) - 43.5)
        still = still + passing * (60 < hz < 200) + hush_db * (200 < hz < 4000)
        return makeup_ratio(still + 16.0 + lumps + 3 * drift(9.2))

    insects = humming(rng.standard_normal((2, N)), 4750, 2.2 / 350)
    insect_db = -78 - 6 * first + np.interp(T, *np.transpose(insect_swell)) + 2.5 * drift(4.9)
    return bands(gain_at, far_alike, grain_db=1) + insects * makeup_ratio(insect_db)


def scene():
    return chops() + bowl_slide() + bowl_hits() + drags() + chicks() + far_birds() + yard()


def band_limit(x):
    return signal.sosfilt(signal.butter(12, 13040, fs=SR, output="sos"), x)


def record(dry):
    # frequency in Hz, phase in radians.
    port_phase = [(20, 0), (520, .1), (780, -.45), (1030, .35), (1800, -.1), (3400, .6), (5400, .1),
                  (8200, -.3), (9400, -1.9), (10350, -3.1), (10900, -4.6), (12600, -5.2)]
    peak_hz, width_hz, peak_db = 9100, 800, 5
    limit = .9
    size = next_fast_len(N)
    hz = np.fft.rfftfreq(size, 1 / SR) + 1
    turn = at_hz(port_phase, hz) * [[.5], [-.5]]
    peak = makeup_ratio(peak_db / (1 + ((hz - peak_hz) / width_hz) ** 2))
    side = (dry[0] - dry[1]) / 2
    lost = side - highpass(side, 1, 180)
    spectrum = rfft(dry - lost * [[1], [-1]], size)
    x = irfft(spectrum * peak * np.exp(1j * turn), size)[:, :N]
    x = signal.sosfilt(signal.butter(8, 11300, fs=SR, output="sos"), x)
    room_left = limit / np.maximum(np.abs(x).max(axis=0), limit)
    held = uniform_filter1d(minimum_filter1d(room_left, size=181), size=89)
    sounding = np.clip(np.maximum(CUT_S[0] - T, T - CUT_S[1]) / 0.001, 0, 1)
    return band_limit(x * held * sounding)


dry = scene()
out = record(dry)
to_wav(out)
```